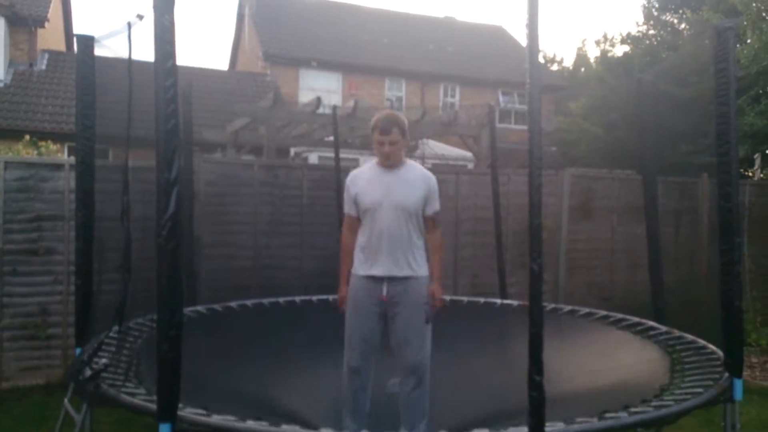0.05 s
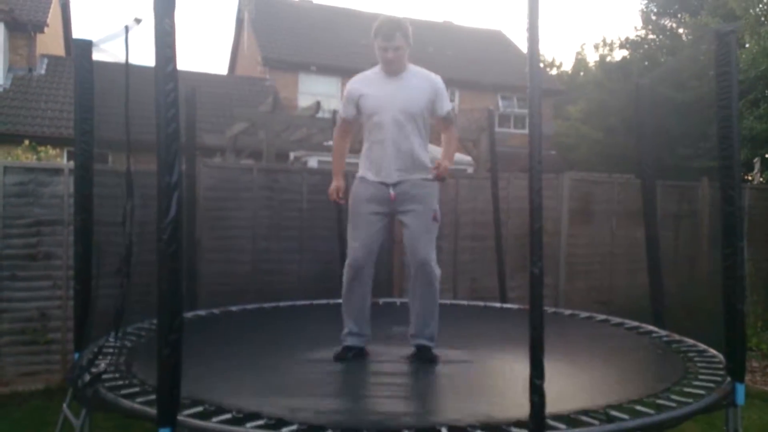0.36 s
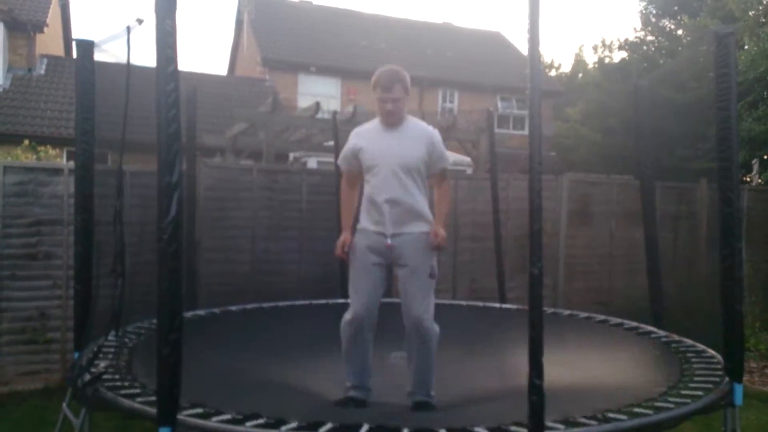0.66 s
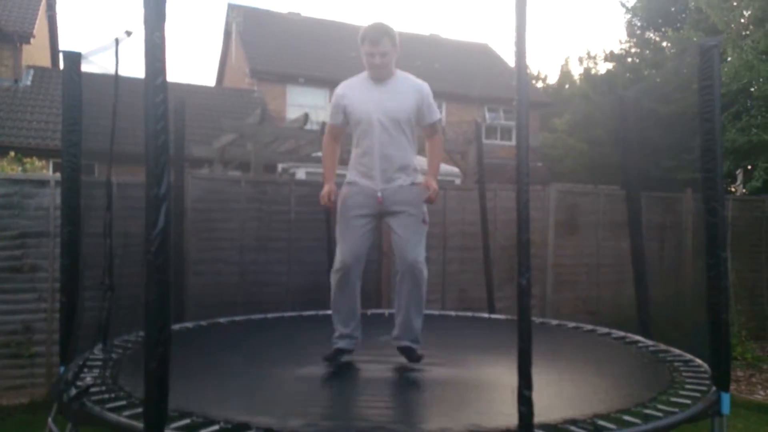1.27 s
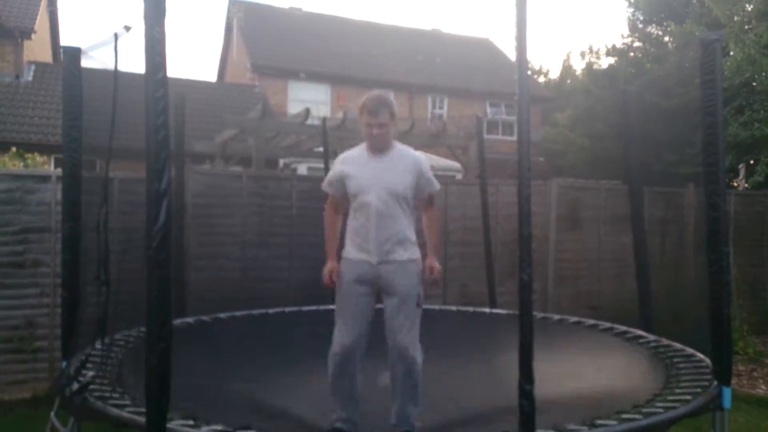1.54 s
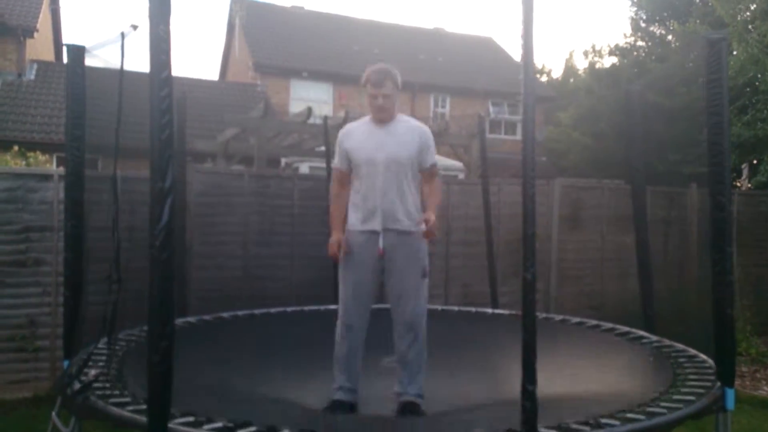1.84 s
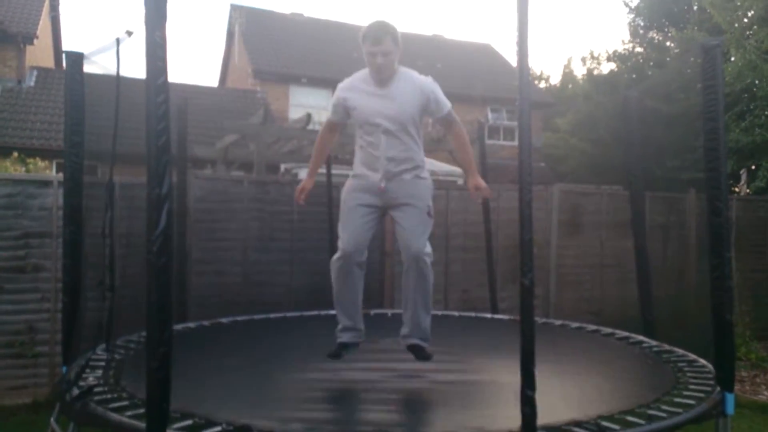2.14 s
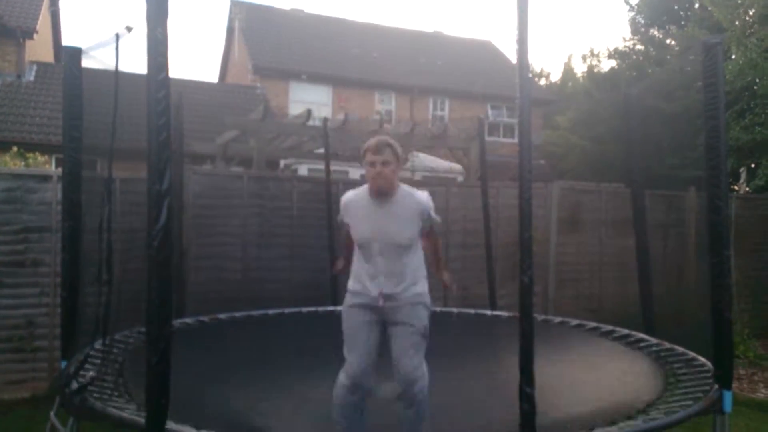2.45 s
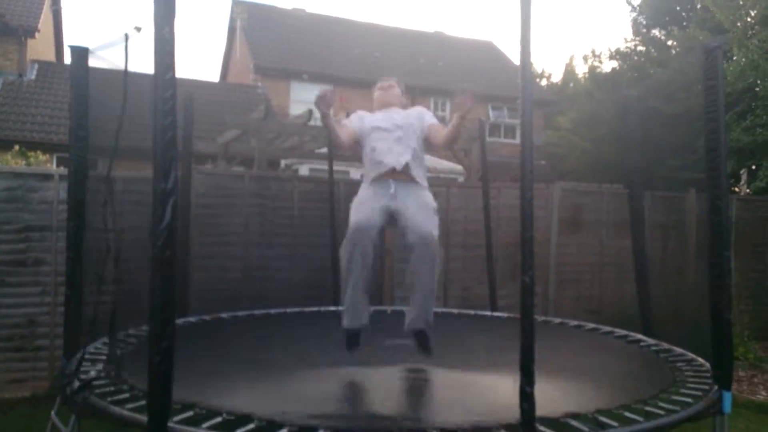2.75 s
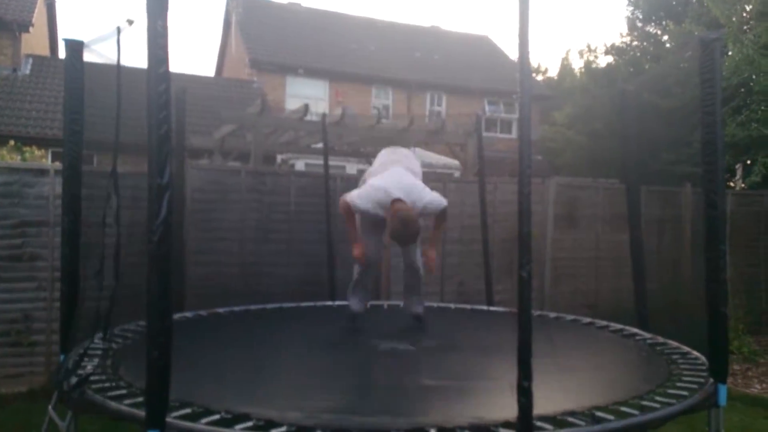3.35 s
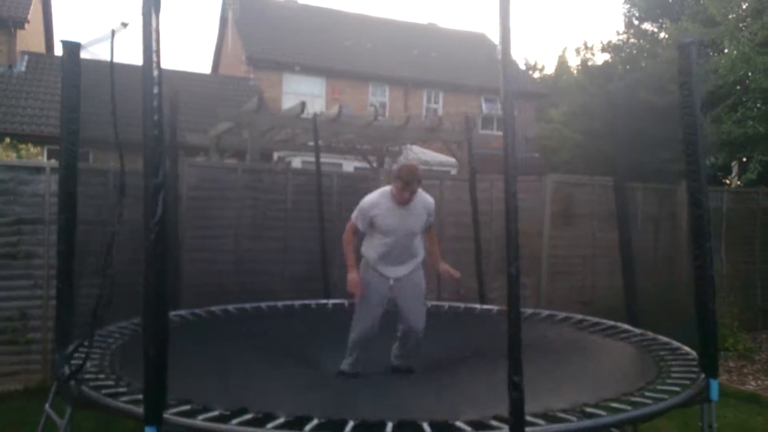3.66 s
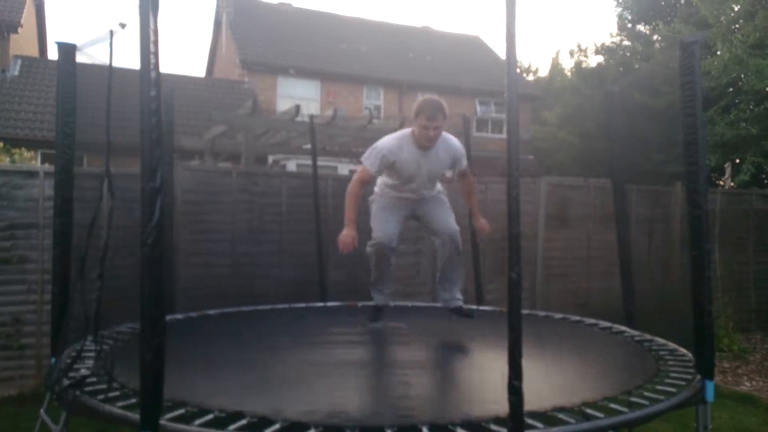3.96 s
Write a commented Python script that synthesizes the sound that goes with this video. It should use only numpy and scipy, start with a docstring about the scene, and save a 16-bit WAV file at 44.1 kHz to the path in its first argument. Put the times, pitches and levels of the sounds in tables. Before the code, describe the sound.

Close, bright clinking and chattering of trampoline springs comes with each bounce, echoing briefly off garden fences. A stronger takeoff leads to a heavy landing that thuds the mat and creaks the frame, while a faint low drone continues behind.

```python
"""Garden trampoline

Someone bounces, ending on the hard landing of a somersault. Each landing jerks the steel springs taut:
they chatter and snap in their hooks, knocking the tube frame, then clink and jingle as they go slack.
The frame creaks, the mat thuds and flaps. Fences return a short echo over a rumble and a low drone."""
import sys
import numpy as np
from scipy import signal
from scipy.fft import rfft, irfft, next_fast_len
from scipy.io import wavfile

SR = 44100
rng = np.random.default_rng(int(sys.argv[2]) if len(sys.argv) > 2 else 0)


def wrap_up_sound(samples):
    """Save the sound to the file named by the first command line argument, as 16-bit audio."""
    columns = np.atleast_2d(samples).T
    # keep every value between -1 and 1, then stretch to whole-number steps
    tamed = np.clip(columns, -1, 1)
    steps = np.round(tamed * 32767).astype(np.int16)
    wavfile.write(sys.argv[1], SR, steps)


N = 176400

# hard hook snaps (t/s, level/dB, frame knock against the tick/dB)
HOOK_SNAPS = [(0.172, 1.5, -1.5), (0.258, -12.5, -0.5), (0.873, -3, -9), (1.002, -11.5, 2),
              (1.676, -2.5, -13), (1.817, 2.5, -3.5), (1.901, -11, 0.5), (2.616, 8.5, -2.5),
              (2.634, 1, 5.5), (3.606, 11.5, -26)]


def snaps(trim_db=-2, catch_s=0.0018, catch_db=-10.5):
    """Under load a hook jumps in its eye and catches again: tick and knock, no coil ring."""
    out = np.zeros((2, N))
    for at, db, frame_db in HOOK_SNAPS:
        for delay, hit_db in ((0, 0), (catch_s, catch_db)):
            tick, _, knock = spring()
            add(out, undb(trim_db + db + hit_db) * (tick + undb(frame_db) * knock), at + delay)
    return out


# bursts of dry chatter (t/s, length/s, level/dB)
TAUT_RATTLES = [(0.732, 0.19, -41.5), (1.6, 0.185, -43), (2.568, 0.063, -27), (3.511, 0.18, -27.5),
                (3.708, 0.33, -38)]


def rattles():
    """Springs stretch under load and chatter, with the ring held back and the frame knocking."""
    return chatter(TAUT_RATTLES, ring_db=-5.5, frame_db=-4)


# loose, bright clinks (t/s, level/dB)
SLACK_CLINKS = [(0.325, -14.5), (0.398, -6), (0.448, -9.5), (0.505, -13.5), (1.181, -3), (1.39, -16),
                (1.704, -2), (2.147, -12.5), (2.824, 3.5), (3.007, 3.5), (3.875, 6)]
SLACK_RING_DB, SLACK_FRAME_DB = -2.5, -10


def clinks(bounces=3, gap_s=0.0063, fall_db=-6.5):
    """A slack spring bounces in its hook, softer each time, and rings freely."""
    out = np.zeros((2, N))
    for at, db in SLACK_CLINKS:
        for k in range(bounces):
            hit = spring_hit(SLACK_RING_DB, SLACK_FRAME_DB)
            add(out, undb(db + k * fall_db) * hit, at + k * gap_s * rng.uniform(0.62, 1.3))
    return out


# washes of jingle (t/s, length/s, level/dB)
SLACK_JINGLES = [(0.0, 0.071, -37), (0.36, 0.041, -36.5), (0.735, 0.21, -46.5), (1.135, 0.087, -42.5),
                 (1.98, 0.093, -38), (2.462, 0.21, -34), (2.77, 0.36, -32.5), (2.826, 0.026, -26.5),
                 (3.87, 0.016, -17), (1.563, 0.034, -36)]


def jingles():
    """Slack coils swing freely and chatter, with more ring and little frame."""
    return chatter(SLACK_JINGLES, SLACK_RING_DB, SLACK_FRAME_DB)


# jolts as the feet take up the mat (t/s, length/s, level/dB)
FOOT_JOLTS = [(0.722, 0.0067, -30), (1.555, 0.0049, -26.5), (2.455, 0.0063, -32.5), (2.548, 0.0061, -21.5),
              (3.491, 0.096, -30)]
# their splashy EQ (f/Hz, level/dB)
JOLT_EQ = [(3000, -26), (5000, -9), (7600, 4), (13000, 0)]


def jolts():
    """Feet jerk the mat taut: all the hooks seat at once in a bright crash."""
    return sum(envelopes(FOOT_JOLTS, attack_s=0.0029, release_s=0.0099)) * noise(JOLT_EQ, 0.24)


def chatter(bursts, ring_db, frame_db, springs=12, turn_s=0.04, spread_db=5, trim_db=1.5):
    """Springs round the rim take turns to shake, each with its own ring."""
    force = np.sqrt(sum(burst ** 2 for burst in envelopes(bursts)))
    drive = force * slips()
    # each turn deals the springs new shares of the slips
    turn = int(SR * turn_s)
    activity = rng.standard_normal((springs, N // turn + 1))
    share = undb(2 * spread_db * np.repeat(activity, turn, axis=1)[:, :N])
    slipping = (np.cumsum(share, axis=0) / share.sum(axis=0) < rng.random(N)).sum(axis=0)
    out = 0
    for k in range(springs):
        hit = spring_hit(ring_db, frame_db)
        out = out + signal.oaconvolve((drive * (slipping == k))[None], hit, axes=1)[:, :N]
    return undb(trim_db) * out


def slips(per_s=520, spread_db=4):
    """Stick-slip: irregular impulses of uneven size, rms 1."""
    sizes = undb(spread_db * np.clip(rng.standard_normal(N), -2, 2))
    return unit((rng.random(N) < per_s / SR) * sizes) * np.sqrt(N)


def spring_hit(ring_db, frame_db):
    """One slip as a single hit, with coil ring and frame knock set against the hook's tick."""
    tick, ring, knock = spring()
    return unit(tick + undb(ring_db) * ring + undb(frame_db) * knock)


# glassy partials of a coil (f/Hz, level/dB)
COIL_MODES = [(2660, -2.5), (7350, 14.5), (7440, 12), (7860, 6.5), (9300, 2), (14150, 8.5)]
# EQ of the hook's sharp tick (f/Hz, level/dB)
TICK_EQ = [(1000, -21.5), (2300, -38), (3000, -16), (5000, -9), (6500, -3.5), (7700, 7.5), (9500, -5),
           (11000, -2), (12700, -2.5), (14200, -3.5)]
# EQ of the frame's fuller knock (f/Hz, level/dB)
KNOCK_EQ = [(400, -21.5), (1000, -7), (1550, -7.5), (2020, -0.5), (2400, -4), (3000, 0.5), (3700, 0),
            (15000, 0.5)]


def spring(detune=0.00803, t60_s=0.15, max_lag_s=0.0004):
    """One spring, off to one side, answers a slip: (hook tick, coil ring, frame knock)."""
    t = np.arange(SR // 4) / SR
    lag = int(rng.choice([-1, 1]) * rng.uniform(.5, 1) * max_lag_s * SR)
    ring = 0
    for hz, db in COIL_MODES:
        phase = 2 * np.pi * (hz * (1 + detune * rng.standard_normal()) * t + rng.random((2, 1)))
        ring = ring + undb(db) * rng.rayleigh() * np.sin(phase)
    ring = unit(ring * fade(t, t60_s))
    return crack(t, TICK_EQ, lag), ring, crack(t, KNOCK_EQ, lag)


def crack(t, eq, lag, decay_s=0.0024, overtone_count=36, overtone_db=0.5):
    """Steel hits steel: a noise transient, its echo off the fences and the wire's scattered overtones."""
    direct = pair(0.96, size=len(t))
    direct[0] = np.roll(direct[0], lag)
    echo = undb(-6.5) * np.exp(-t / 0.016) + undb(-19.5) * np.exp(-t / 0.16)  # slap, then tail
    hit = unit(direct * np.exp(-t / decay_s) + echo * rng.standard_normal((2, len(t))))
    spectrum = np.zeros((2, len(t) // 2 + 1), complex)
    places = (np.arange(overtone_count) + rng.random(overtone_count)) / overtone_count
    bins = (places * spectrum.shape[1]).astype(int)
    strengths = rng.rayleigh(size=overtone_count)
    spectrum[:, bins] = strengths * np.exp(2j * np.pi * rng.random((2, overtone_count)))
    overtones = unit(irfft(spectrum, len(t)) * fade(t, t60_s=0.11))
    return unit(colour(hit + undb(overtone_db) * overtones, eq))


# creaks under the heaviest load (t/s, length/s, level/dB)
FRAME_CREAKS = [(3.577, 0.035, -33), (3.658, 0.075, -38)]
# hollow midrange EQ of the tubes (f/Hz, level/dB)
TUBE_EQ = [(500, -29), (900, 2), (1300, 1), (2100, -6), (4500, -9)]


def creaks(decay_s=0.016):
    """Joints of the frame stick and slip, ringing the tubes."""
    t = np.arange(SR // 4) / SR
    tubes = unit(colour(pair(0, size=len(t)) * np.exp(-t / decay_s), TUBE_EQ))
    load = sum(envelopes(FRAME_CREAKS))
    return signal.oaconvolve((load * slips())[None], tubes, axes=1)[:, :N]


# specks of sparkle (t/s, level/dB)
METAL_PINGS = [(3.155, -44), (3.272, -43)]


def pings(hz=11900, t60_s=0.11):
    """Tiny, high metal pings, each one fading sine."""
    t = np.arange(SR // 4) / SR
    out = np.zeros((2, N))
    for at, db in METAL_PINGS:
        tone = np.sin(2 * np.pi * (hz * t + rng.random((2, 1)) / 2))
        add(out, undb(db) * tone * fade(t, t60_s), at)
    return out


# soft flaps of mat and cloth (t/s, length/s, level/dB)
MAT_FLAPS = [(2.416, 0.077, -43), (2.856, 0.14, -45.5), (3.467, 0.098, -33)]
# dull, bass-heavy EQ of the fabric (f/Hz, level/dB)
MAT_EQ = [(30, 15.5), (110, 1.5), (165, 0), (235, 2), (480, -10.5), (4000, -28)]
# partials of the thud (multiple of the lowest mode, level/dB)
MAT_MODES = [(1, 2), (1.59, -5), (2.3, -6), (3.5, -11.5)]


def mat(thud_at_s=3.518, lowest_hz=31.55, swell_s=0.079, left_db=-10):
    """Dull flaps of fabric; the hard landing sets the low modes of the sagging mat swinging."""
    out = sum(envelopes(MAT_FLAPS, attack_s=0.011, release_s=0.19)) * noise(MAT_EQ, 0.95)
    t = np.arange(SR // 2) / SR
    swing = sum(undb(db) * np.sin(2 * np.pi * (k * lowest_hz * t + rng.random())) for k, db in MAT_MODES)
    swell = t / swell_s * np.exp(1 - (t / swell_s) ** 2) / 2
    thud = undb(-17.5) * swing * swell
    add(out, np.array([undb(left_db) * thud, thud]), thud_at_s)
    return out


# EQ of the outdoor bed (f/Hz, level/dB)
RUMBLE_EQ = [(30, -1), (60, -1.5), (85, -7.5), (170, -18.5), (300, -22), (600, -30), (950, -27),
             (1600, -37), (15000, -55)]
# pitch and level ride of the drone (t/s, f/Hz, level/dB)
DRONE_PATH = [(.5, 54.43, -51), (.64, 46.5, -37.5), (1.05, 53.84, -46.5), (1.22, 49.65, -34.5),
              (1.469, 49.97, -37.5), (1.741, 52.92, -35.5), (1.879, 65.7, -46), (2.898, 68, -43.5),
              (4.0, 67.55, -37)]


def outdoors(rumble_db=-38.5):
    """Steady rumble and a wavering drone like a far engine; the bass leans right."""
    t = np.arange(N) / SR
    times, hz, db = np.array(DRONE_PATH).T
    pitch_waver, level_waver = noise([(6, 35), (60, -92)], 0)
    phase = 2 * np.pi * np.cumsum(np.interp(t, times, hz) * (1 + 0.011 * pitch_waver)) / SR
    drone = np.sqrt(2) * undb(np.interp(t, times, db) + 1.6 * level_waver) * np.sin(phase)
    left, right = undb(rumble_db) * noise(RUMBLE_EQ, 0.47) + drone
    return np.array([colour(left, [(50, -4), (400, 0)]), colour(right, [(50, 2), (400, 0)])])


def undb(db):
    """Decibels to gain."""
    return 10 ** (np.asarray(db) / 20)


def unit(x):
    """Scale to a mean energy of 1 per channel."""
    return x / np.sqrt(np.mean(np.sum(x ** 2, axis=-1)))


def fade(t, t60_s):
    """Ring-out that falls 60 dB in t60_s."""
    return np.exp(-np.log(1000) * t / t60_s)


def colour(x, eq):
    """Minimum-phase EQ through (f/Hz, level/dB) points."""
    hz, db = np.array(eq, float).T
    n = next_fast_len(x.shape[-1] + 4096) // 2 * 2
    curve_db = np.interp(np.log(np.arange(n // 2 + 1) * SR / n + 1), np.log(hz), db)
    cepstrum = irfft(curve_db * np.log(10) / 20)
    cepstrum[1:n // 2] *= 2
    cepstrum[n // 2 + 1:] = 0
    return irfft(rfft(x, n) * np.exp(rfft(cepstrum)))[..., :x.shape[-1]]


def pair(correlation, size):
    """Stereo white noise, from wide (0) to mono (1)."""
    white = rng.standard_normal((3, size))
    return np.sqrt(correlation) * white[0] + np.sqrt(1 - correlation) * white[1:]


def noise(eq, correlation):
    """Coloured stereo noise, rms 1."""
    return unit(colour(pair(correlation, size=N), eq)) * np.sqrt(N)


def envelopes(bursts, attack_s=0.0035, release_s=0.0073):
    """One attack-hold-release envelope for each (t/s, length/s, level/dB) row."""
    for at, length, db in bursts:
        t = np.arange(N) / SR - at
        yield undb(db) * np.clip(t / attack_s, 0, 1) * np.exp(-np.maximum(t - length, 0) / release_s)


def add(out, x, at):
    """Mix x into out, starting at a time in seconds."""
    i = max(int(at * SR), 0)
    out[:, i:i + x.shape[1]] += x[:, :N - i]


# treble colour the two microphone ports give the steel (f/Hz, left level/dB, right level/dB)
PORT_EQ = [(5190, 2, 1.5), (6420, 0, -3.5), (7890, -2, 0), (9590, 5, -5.5), (12670, -8.5, -8.5)]


def scene():
    """The steel up front, EQ'd per side, over the mat and the garden."""
    taut = snaps() + rattles() + creaks()
    slack = clinks() + jingles()
    steel = jolts() + taut + slack
    steel = np.array([colour(steel[c], np.array(PORT_EQ)[:, [0, c + 1]]) for c in range(2)])
    return steel + pings() + mat() + outdoors()


def record(dry, top_hz=15500):
    """A steep low-pass takes off the very top."""
    return signal.sosfilt(signal.ellip(10, .2, 80, top_hz, fs=SR, output="sos"), dry)


dry = scene()
out = record(dry)
wrap_up_sound(out)
```